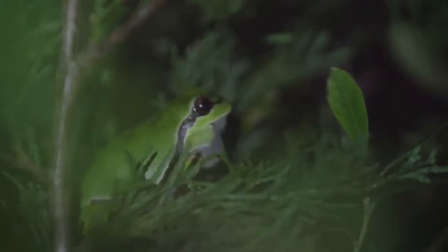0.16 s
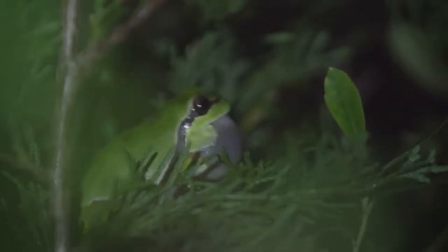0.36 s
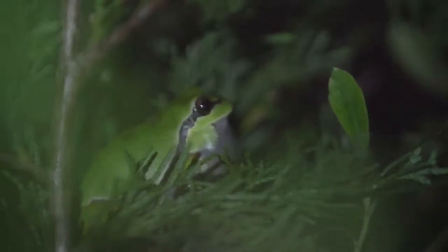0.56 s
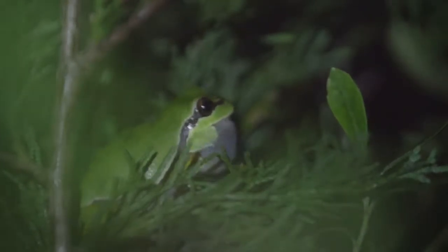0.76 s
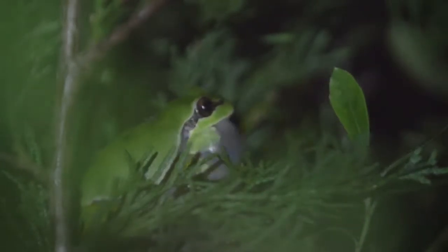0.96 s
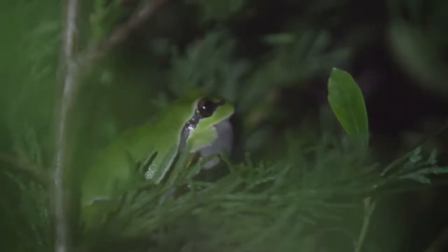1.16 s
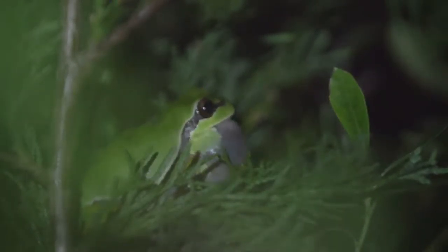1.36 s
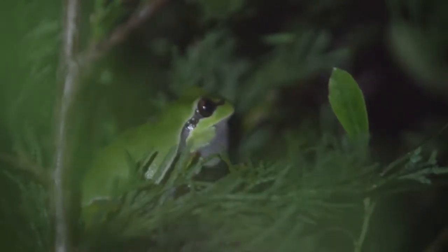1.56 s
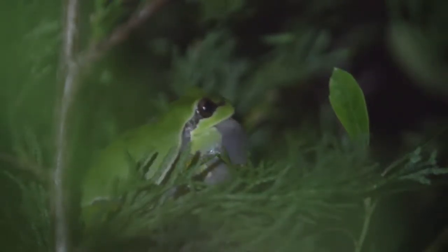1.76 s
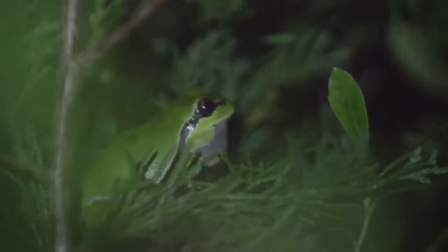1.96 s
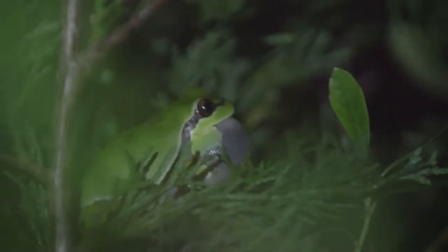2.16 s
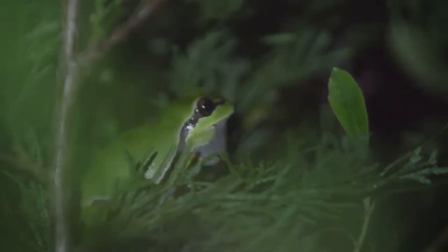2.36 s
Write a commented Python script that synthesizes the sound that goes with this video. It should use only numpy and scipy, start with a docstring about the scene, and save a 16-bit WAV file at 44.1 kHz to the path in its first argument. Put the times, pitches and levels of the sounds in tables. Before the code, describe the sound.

A treefrog honks close by six times, at about 0.2, 0.6, 1.0, 1.3, 1.7 and 2.1 seconds. Each call lasts roughly a tenth of a second, harsh and buzzy, on the same fairly high pitch, brightening as it goes and leaving a slight echo. Throughout, much quieter crickets trill left and right, a katydid rasps faintly and distant frogs blur over a low murmur, dipping briefly under each honk.

```python
"""Among bushes at night, a treefrog honks six times close to a stereo microphone. Its vocal cords buzz
near 1.1 kHz and a slower flap lets every third cycle through, then slips to every fourth, which makes
the call harsh; the swelling vocal sac rings ever brighter. Behind it crickets trill, a katydid rasps
and a far chorus of frogs murmurs. The recorder's gain control ducks under each honk."""
import sys
import numpy as np
from scipy import signal
from scipy.fft import rfft, irfft
from scipy.io import wavfile
from scipy.ndimage import uniform_filter1d

SR = 44100
rng = np.random.default_rng(int(sys.argv[2]) if len(sys.argv) > 2 else 0)


def to_wav(sig):
    """Store sig (one row per channel, or 1-D mono) as 16-bit WAV at the path in sys.argv[1].

    Samples outside -1..1 are clipped; the rate is SR.
    """
    pcm = np.clip(np.atleast_2d(sig), -1, 1) * 32767
    pcm = np.round(pcm).astype(np.int16)
    wavfile.write(sys.argv[1], SR, pcm.T)  # frames by channels


N = 110250

# The near frog's calls. Each row: start in seconds, length in seconds, level in dB, cord pitch in Hz,
# pitch rise in Hz per second, seconds until the flap slips, seconds of uneven beating after that.
CALLS = [(0.2141, 0.11, 0.5, 1096, 651, .072, .04), (.5882, 0.11, 0.5, 1108, 335, 0.071, 0),
         (0.972, 0.11, 1, 1108, 296.3, 0.068, 0), (1.3485, 0.11, 0.5, 1100, 407.4, 0.061, 0),
         (1.735, 0.11, 0.5, 1094, 588, .061, .017), (2.121, 0.12, 0, 1094, 620, 0.075, .05)]
# The course of every call. Each row: seconds from its start, push in dB, pitch bend in Hz,
# sac resonance in Hz, sac ring in dB, treble buzz in dB.
CALL_COURSE = [(-.017, -34, -100, 1900, 8.5, -25), (-.005, -10, -39.5, 2290, 2, -7.5),
               (.004, 1.5, -50.5, 2200, -7, -7), (0.019, 2.5, -1, 2270, 8, 6.5),
               (.035, 3.5, 1, 2190, 10.5, 5.5), (.054, -1.5, -2.5, 2330, 19, 3.5),
               (.07, 0.5, -2.5, 2480, 22, -0.5), (.1, -1, 6.5, 2464, 22, 0.5)]
# The frog's throat, treble buzz and rush of air. Each row: frequency in Hz, gain in dB.
THROAT_COLOUR = [(400, -62), (760, -31), (880, -35), (1060, 2), (1380, 1.5), (1520, -1), (1720, -14),
                 (1900, -15.5), (2250, -11.5), (2620, -14.5), (3000, -20.5), (3750, -29), (4300, -39.5),
                 (4900, -42), (5400, -71.5), (9000, -73)]
BUZZ_COLOUR = [(4000, -24.5), (5300, -19), (6000, -6.5), (7000, -29), (8200, -28), (9350, 3),
               (10000, -11.5), (11000, -11), (13500, -32.5)]
RASP_COLOUR = [(1500, -27), (2400, -9), (3000, -8), (3900, 3.5), (4700, -4.5), (7000, -42.5)]
# How the frog reaches the microphone. Each row: frequency in Hz, left minus right in dB.
FROG_BALANCE = [(1100, 0), (1480, 0.5), (1800, 14), (2020, 7.5), (2260, -7.5), (2600, -8), (2850, 5.5),
                (3200, 0), (4100, 10), (5000, -1), (9000, 0.5)]
# The frog's echo off the bushes. Each row: frequency in Hz, gain in dB.
ECHO_COLOUR = [(900, -25.5), (1500, 4), (2300, 1), (2650, 2.5), (3500, 12.5), (9000, -6.5)]
# The crickets. Each row: wing strokes per second, pitch in Hz, level in dB, left minus right in dB,
# start in seconds.
CRICKETS = [(35.07, 3120, -45, 13.5, 0), (24.16, 3130, -46, 1, 0.013), (44.06, 3170, -45, -9, 0),
            (53.7, 3110, -48, -1, 1.6)]
# The katydid, far frogs, far low murmur and night air. Each row: frequency in Hz, gain in dB.
KATYDID_COLOUR = [(6600, -30.5), (7200, -9.5), (7550, 0), (7720, -9.5), (7830, -14.5), (8000, -12.5),
                  (8600, -15), (9200, -24)]
CHORUS_COLOUR = [(100, -55), (500, -29.5), (760, -5.5), (950, -1.5), (1130, 3), (1300, -3.5), (1500, -3.5),
                 (1720, -14), (1870, -12), (2080, -21), (2270, -26.5), (2420, -8), (2570, -29.5),
                 (2780, -30.5), (3600, -28.5), (5000, -48)]
MURMUR_COLOUR = [(25, -50), (50, -46), (80, -35), (105, -18), (170, -12), (230, 0), (330, -1.5), (450, -1),
                 (560, -3), (640, -12), (800, -10.5), (1100, -39.5), (1800, -81.5)]
AIR_COLOUR = [(60, -21), (1500, -6.5), (3800, -1.5), (5000, 1), (6000, 7), (9000, 3.5), (10500, -1.5),
              (13000, -31), (15500, -15)]

FROG_DB, BUZZ_DB, RASP_DB, SAC_WIDTH_HZ = 16.5, -32.5, -43, 189
PULSE_S, JITTER, SHIMMER_DB, LEAK_SHIMMER_DB = .00003, .0015, .3, 8
CATCH_S, LOCK_S, START_LEAK_DB = -.003, .006, -11   # the flap catches, then locks to every third cycle
ENDING_S, FLAP_FADE_S, END_LEAK_DB = .01, .014, -18   # the flap drifts open as the call ends
PITCH_SAG_HZ_PER_S, SAC_SAG_HZ_PER_S = 2200, 20500
END_FADE_DB_PER_S, RELEASE_DB_PER_S = 442.5, 1294.5
WHISTLE_HZ, WHISTLE_ARCH_HZ, WHISTLE_WIDTH_HZ, WHISTLE_DB = 9200, 2000, 880, -56
ECHO_DB, ECHO_T60_S, ECHO_DELAY_S, CALL_GAP_S = -21, 0.44, 0.017, .37
CHIRP_S, CHIRP_FALL_HZ, CHIRP_SPREAD_DB, CRICKET_WANDER, CRICKET_ECHO_DB = .021, 381, 1.2, .05, -6
KATYDID_DB, KATYDID_THROB_HZ, KATYDID_DEPTH = -57.5, 49.2, 0.44
THIN_RASP_HZ, THIN_RASP_DB, THIN_RASP_STOP_S = 12100, -71.5, 1.0
CHORUS_DB, CHORUS_PAN_DB, CHORUS_FLUTTER_DB = -39.5, 2.5, 2
MURMUR_DB, MURMUR_SWELL_DB, AIR_DB, TREBLE_LIKENESS = -41, .7, -60.5, .45
LIMIT_DB, LIMIT_SHARE, LIMIT_ATTACK_S, LIMIT_RELEASE_DB_PER_S = -20.5, 0.44, 0.0013, 44
CUTOFF_HZ = 15800


def treefrog():
    """Close to the microphone: cord pulses, thinned by the flap, ring in the throat and vocal sac."""
    pulses, sac_hz, sac_db, buzz_db, arch = np.zeros((5, N))
    course_s, *columns = np.transpose(CALL_COURSE)
    sac_hz += CALL_COURSE[-1][3]
    waver = 1 + JITTER * drift(89)
    for start, length, db, pitch, rise, slip_s, uneven_s in CALLS:
        at = np.arange(int((start - .018) * SR), int((start + .16) * SR))
        t = at / SR - start
        push, bend, sac_hz[at], sac_db[at], buzz_db[at] = [np.interp(t, course_s, c) for c in columns]
        arch[at] = np.sin(np.pi * np.clip(t / length, 0, 1))   # the thin whistle rises and falls
        ending_s = np.clip(t - length + ENDING_S, 0, None)
        sag_s = np.minimum(ending_s, 2 * ENDING_S)
        sac_hz[at] -= SAC_SAG_HZ_PER_S * sag_s   # the sac's ring drops as it empties
        cord_hz = (pitch + rise * t + bend - PITCH_SAG_HZ_PER_S * sag_s) * waver[at]
        turns = np.cumsum(cord_hz) / SR
        cycle = np.round(turns).astype(int)
        cycle_times = np.interp(np.arange(cycle[-1] + 1), turns, t)
        strength = flap(cycle_times, length, slip_s, uneven_s)
        fade_db = END_FADE_DB_PER_S * ending_s + RELEASE_DB_PER_S * np.clip(t - length, 0, None)
        from_pulse_s = (turns - cycle) / cord_hz
        puff = np.exp(-(from_pulse_s / PULSE_S) ** 2) / (PULSE_S * SR * np.sqrt(np.pi))
        pulses[at] = from_db(FROG_DB + db + push - fade_db) * strength[cycle] * puff
    throat = colour(pulses, THROAT_COLOUR, causal=False)
    sac = from_db(sac_db) * resonate(throat, sac_hz, SAC_WIDTH_HZ)
    whistle_hz = WHISTLE_HZ + WHISTLE_ARCH_HZ * arch
    whistle = from_db(WHISTLE_DB) * resonate(pulses, whistle_hz, WHISTLE_WIDTH_HZ)
    rush = uniform_filter1d(pulses, size=40) * rng.standard_normal(N)   # air rushes with each pulse
    rasp = colour(rush * from_db(RASP_DB + sac_db), RASP_COLOUR)
    buzz = colour(pulses * from_db(BUZZ_DB + buzz_db), BUZZ_COLOUR)
    return throat + sac + rasp + whistle + buzz


def flap(times, length, slip_s, uneven_s):
    """Strength of each cord cycle: the flap passes every fourth, every third, then slips to fourths."""
    shimmer = rng.standard_normal(SR)[:len(times)]
    chance = rng.random(SR)
    passed, k = np.zeros(len(times)), 0
    while k < len(times):
        passed[k] = 1
        locked = LOCK_S < times[k] < slip_s
        uneven = 0 <= times[k] - slip_s < uneven_s
        k += 3 if locked or (uneven and chance[k] < .5) else 4
    beating = passed * from_db(SHIMMER_DB * shimmer)
    # before the flap catches and as it goes slack, every cycle leaks through weakly
    leak = from_db(LEAK_SHIMMER_DB * shimmer)
    slack = np.clip((times - length + ENDING_S) / FLAP_FADE_S + .5, 0, 1)
    strength = (1 - slack) * beating + slack * from_db(END_LEAK_DB) * leak
    return np.maximum(strength, from_db(START_LEAK_DB) * leak * (times < CATCH_S))


def crickets():
    """Left and right in the bushes: each wing stroke is a short falling tone with faint overtones."""
    out = 0
    for rate, hz, db, pan_db, start in CRICKETS:
        strokes = rng.random() + np.cumsum(rate * (1 + CRICKET_WANDER * drift(4.29))) / SR
        along = np.clip(strokes % 1 / rate / CHIRP_S, 0, 1)
        pitch = hz + CHIRP_FALL_HZ * (.5 - along) + 25 * drift(28.7)
        phase = 2 * np.pi * np.cumsum(pitch) / SR
        tone = np.sin(phase) + from_db(-22) * np.sin(2 * phase) + from_db(-35) * np.sin(3 * phase)
        envelope = np.sin(np.pi * along) ** 2 * from_db(db + CHIRP_SPREAD_DB * drift(24))
        song = tone * envelope * (np.arange(N) / SR >= start)
        out = out + pan(pan_db) * song + from_db(CRICKET_ECHO_DB) * foliage(song)
    return out


def katydids():
    """Faint behind the frog: a throbbing rasp throughout, and a thin higher one that stops."""
    t = np.arange(N) / SR
    phase = 2 * np.pi * KATYDID_THROB_HZ * t
    throb = 1 + KATYDID_DEPTH * (np.sin(phase) + np.cos(2 * phase)) / 2
    thin = noise([(THIN_RASP_HZ - 1100, -25), (THIN_RASP_HZ, 0), (THIN_RASP_HZ + 1300, -25)], alike=.7)
    thin *= np.clip((THIN_RASP_STOP_S - t) * 20, 0, 1)
    rasp = throb * noise(KATYDID_COLOUR, TREBLE_LIKENESS)
    return from_db(KATYDID_DB) * rasp + from_db(THIN_RASP_DB) * thin


def far_chorus():
    """In the distance, frogs blur into a fluttering chorus over a low murmur and faint hiss."""
    flutter = from_db(CHORUS_DB + CHORUS_FLUTTER_DB * drift(23))
    chorus = flutter * pan(CHORUS_PAN_DB) * noise(CHORUS_COLOUR, alike=0.18)
    murmur = from_db(MURMUR_DB + MURMUR_SWELL_DB * drift(2)) * noise(MURMUR_COLOUR, alike=0.96)
    air = from_db(AIR_DB) * noise(AIR_COLOUR, TREBLE_LIKENESS)
    return chorus + murmur + air


def foliage(x):
    """Scattered echoes from the bushes, different on each side of the microphone."""
    t = np.arange(SR // 2) / SR
    tail = rng.standard_normal((2, len(t))) * from_db(-60 * t / ECHO_T60_S) * (t > ECHO_DELAY_S)
    return signal.fftconvolve(x[None], tail / np.sqrt(np.sum(tail[0] ** 2)), axes=1)[:, :N]


def resonate(x, hz, width_hz, block=64):
    """A resonance of unit gain whose centre moves."""
    r = np.exp(-np.pi * width_hz / SR)
    b = np.array([1, 0, -1]) * (1 - r * r) / 2
    out, state = np.zeros(N), np.zeros(2)
    for i in range(0, N, block):
        a = [1, -2 * r * np.cos(2 * np.pi * hz[i] / SR), r * r]
        out[i:i + block], state = signal.lfilter(b, a, x[i:i + block], zi=state)
    return out


def colour(x, points, share=1, causal=True):
    """Filter through (Hz, dB) points: minimum phase, or else zero phase, which keeps pulses sharp."""
    size = 2 ** 17
    hz, db = np.transpose(points)
    bin_hz = np.arange(size // 2 + 1) * SR / size
    gain = from_db(np.interp(np.log(bin_hz + 1), np.log(hz), db) * share)
    if causal:
        cepstrum = irfft(np.log(gain))
        cepstrum[1:size // 2] *= 2
        cepstrum[size // 2 + 1:] = 0
        gain = np.exp(rfft(cepstrum))
    return irfft(rfft(x, size) * gain)[..., :N]


def noise(points, alike):
    """Coloured stereo noise of unit power with a left-right likeness from 0 to 1."""
    mid, side = rng.standard_normal((2, N))
    stereo = np.sqrt(1 + alike) * mid + np.sqrt(1 - alike) * side * [[1], [-1]]
    return unit_power(colour(stereo, points))


def drift(hz):
    """A random wander of unit power, mostly slower than the given rate."""
    r = np.exp(-2 * np.pi * hz / SR)
    return unit_power(signal.lfilter([1], [1, -2 * r, r * r], rng.standard_normal(N + SR))[SR:])


def pan(db):
    """Left and right gains, this many dB apart."""
    return from_db(np.array([[.5], [-.5]]) * db)


def unit_power(x):
    """Scale to a mean square of one."""
    return x / np.sqrt(np.mean(x ** 2) + 1e-20)


def from_db(db):
    """Decibels to gain."""
    return 10 ** (np.asarray(db) / 20)


def scene():
    """At the microphone: the near frog and its echoes, the insects behind, the chorus far off."""
    frog = treefrog()
    direct = np.array([colour(frog, FROG_BALANCE, share=side) for side in (.5, -.5)])
    echoes = from_db(ECHO_DB) * foliage(colour(frog, ECHO_COLOUR))
    # the echo of one earlier call dies away at the start
    opening = np.arange(N) / SR < CALL_GAP_S / 2
    earlier_echo = np.roll(echoes, -int(CALL_GAP_S * SR), axis=1) * opening
    return direct + echoes + earlier_echo + crickets() + katydids() + far_chorus()


def record(dry):
    """The recorder's gain control ducks everything under each call and recovers; the top is cut."""
    r = np.exp(-1 / (LIMIT_ATTACK_S * SR))
    power = signal.lfilter([1 - r], [1, -r], np.mean(dry ** 2, axis=0))
    over_db = np.maximum(10 * np.log10(power + 1e-12) - LIMIT_DB, 0)
    release_db = LIMIT_RELEASE_DB_PER_S * np.arange(N) / SR
    held_db = np.maximum.accumulate(over_db + release_db) - release_db
    gain = from_db(-LIMIT_SHARE * signal.lfilter([1 - r], [1, -r], held_db))
    return signal.sosfilt(signal.cheby2(16, 60, CUTOFF_HZ, fs=SR, output="sos"), dry * gain)


dry = scene()
out = record(dry)
to_wav(out)
```